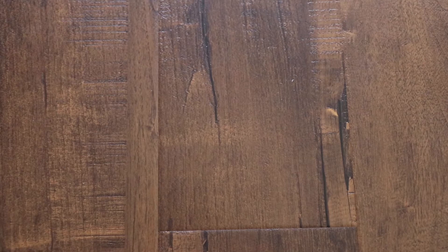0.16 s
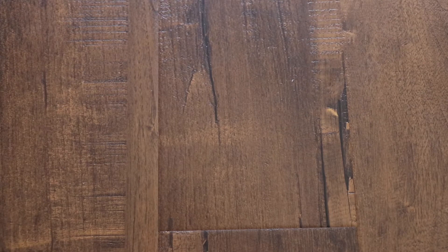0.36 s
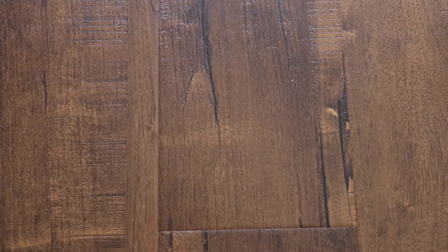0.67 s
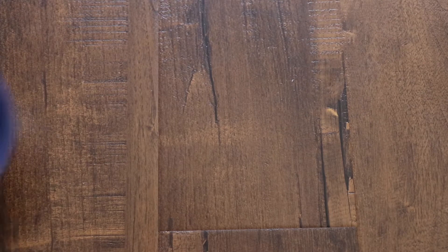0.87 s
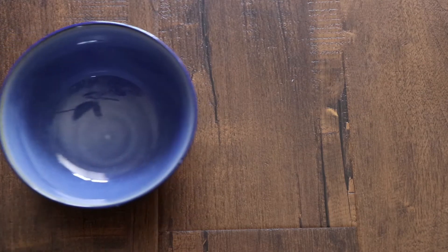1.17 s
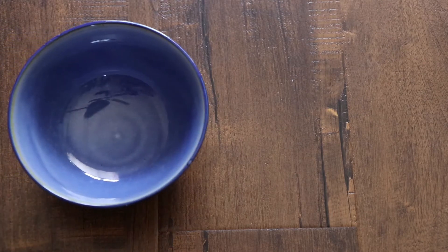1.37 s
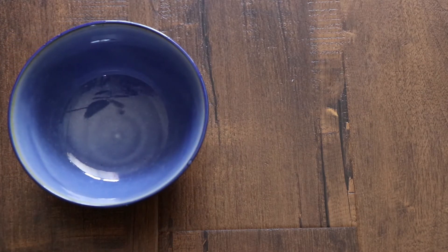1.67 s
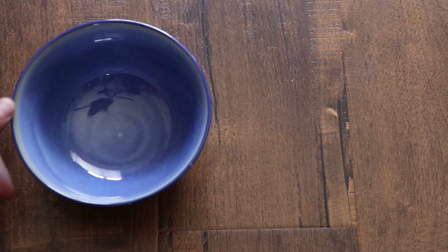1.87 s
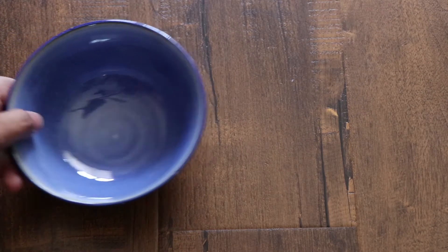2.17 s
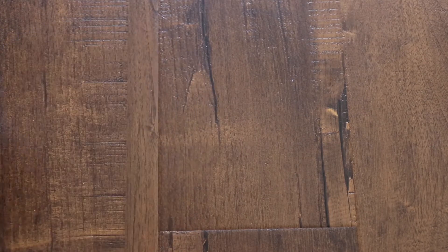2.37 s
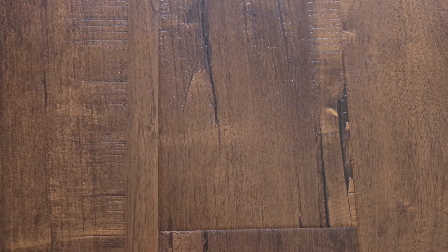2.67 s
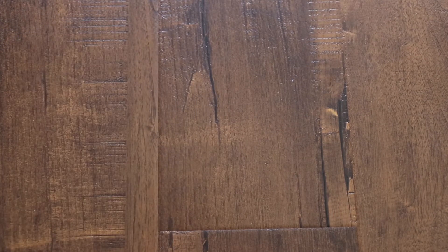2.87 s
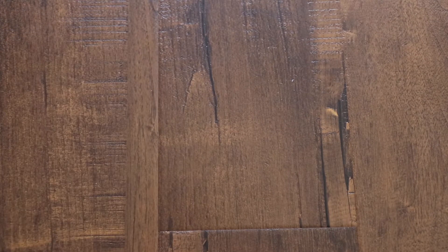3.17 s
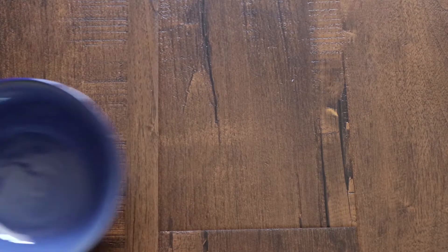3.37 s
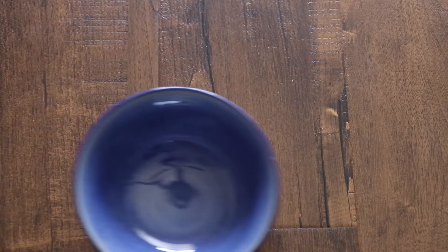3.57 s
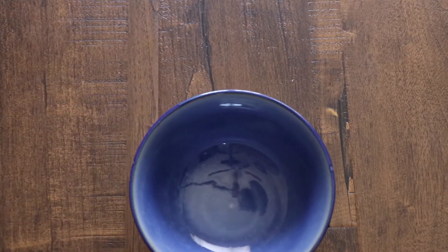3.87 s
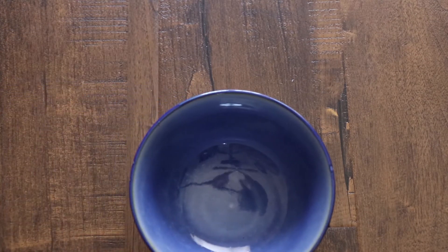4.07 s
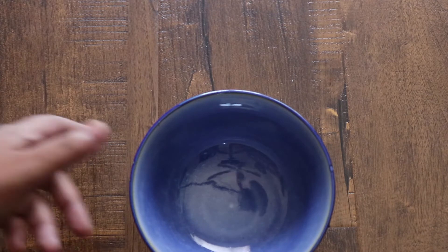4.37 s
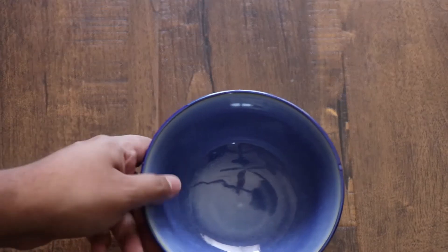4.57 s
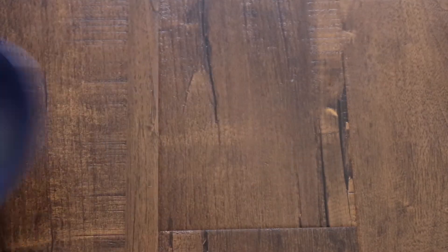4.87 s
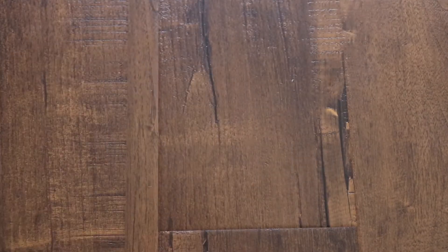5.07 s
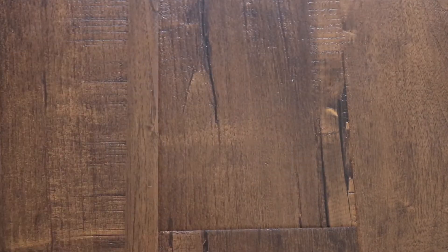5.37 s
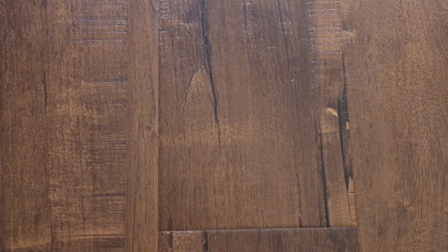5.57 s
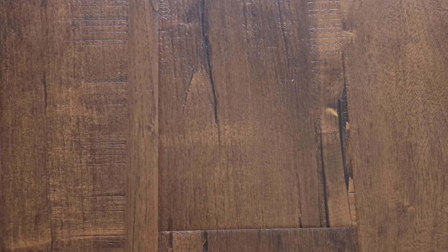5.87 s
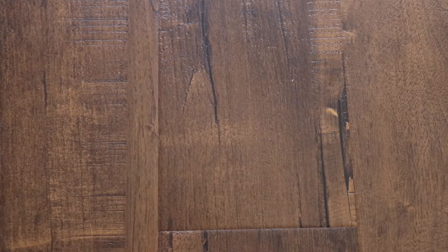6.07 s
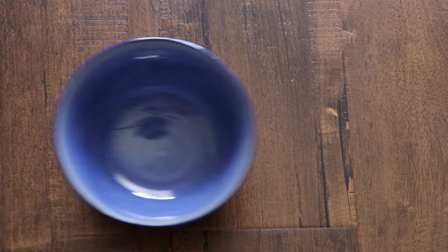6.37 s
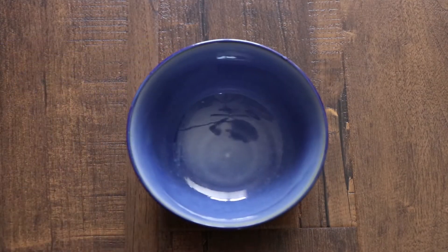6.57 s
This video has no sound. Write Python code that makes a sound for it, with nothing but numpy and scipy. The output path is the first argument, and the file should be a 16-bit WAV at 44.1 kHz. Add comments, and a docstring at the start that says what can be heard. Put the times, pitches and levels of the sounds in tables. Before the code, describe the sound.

Short hollow scrapes and knocks of a heavy ceramic bowl slid over a wooden tabletop, with pauses, faint cloth rustle, low room rumble and hiss.

```python
"""A quiet room rumbles and murmurs behind a steady hiss; then a ceramic bowl is set down with knocks.
It is pushed across a wooden table and lifted off again, several times, and a sleeve rustles.
Uneven impacts under the foot drive the resonances of the table, and grit those of the glazed wall.
A slow rim tone sings as pushes end; filtered noise makes the rub, cloth, room and hiss."""
import sys
import numpy as np
from scipy import signal
from scipy.fft import rfft, irfft, next_fast_len
from scipy.io import wavfile
from scipy.ndimage import uniform_filter1d, map_coordinates

SR = 44100
rng = np.random.default_rng(int(sys.argv[2]) if len(sys.argv) > 2 else 0)


def output_pcm(signal):
    """Save a mono or channel-first signal as 16-bit PCM at the path in sys.argv[1].

    Samples are clipped to [-1, 1] before scaling.
    """
    pcm = np.clip(np.atleast_2d(signal).T, -1, 1) * 32767
    wavfile.write(sys.argv[1], SR, np.round(pcm).astype(np.int16))


N = 295911  # length in samples

# Knocks of the foot on the table, as relative drive levels.
# Each row: time in seconds, boards in dB, then frame (thud) and snap (hardness) in dB re the boards.
KNOCK_BLOWS = [(0.452, -23.5, -41, -26), (0.462, -37.5, 3, -30), (0.478, -32, -1, -34),
               (0.683, -53.5, 14.5, -29), (0.741, -33, -30, -26), (0.767, -25, -35, -24),
               (0.916, -24, -11, -22), (0.952, -16, -19, -33), (0.963, -6, -24, -14),
               (1.002, -22, -22, -6.5), (1.128, -19.5, -8, -23), (2.186, -44.5, 10, -6.5),
               (2.234, -34, -21, -24), (3.15, -32.5, -17, -14), (3.317, -17, -23, -12.5),
               (3.356, -14, -36, -15), (3.37, -9, -32, -22), (3.387, -16, -3, -25), (3.399, -13, -24, -20),
               (3.445, -16, -23, -19), (3.518, -16.5, -14, -16), (3.716, -22, -15, -30),
               (3.774, -19, -31, -31), (3.816, -27, -15, -19.5), (4.566, -55, 11.5, -11.5),
               (4.587, -37.5, -11, -13), (4.645, -18.5, -13, -29), (4.678, -20.5, -17, -25),
               (4.691, -24, -20, -20), (5.465, -15, -30, -15.5), (5.485, -40, -9, -22),
               (5.505, -23, -22, -14.5), (5.546, -26, -26, -23), (5.704, -17.5, -39, -15.5),
               (5.724, -24.5, -11.5, -24), (5.948, -47, -9, -22), (5.968, -22, -8.5, -16.5),
               (6.075, -20.5, -31, -10.5), (6.18, -11, -31, -16), (6.187, -7.5, -25, -19),
               (6.203, -11.5, -33, -18), (6.229, -14.5, -17, -20), (6.386, -11.5, -15, -31),
               (6.396, -16, -18, -19), (6.441, -17, -17, -23), (6.603, -28.5, -5, -14),
               (6.624, -25.5, -6, -26)]
# Resonances of the wooden table: boards, strongest mode, lower modes of the frame, higher modes,
# and short modes at the top. Each row: centre in Hz, width in Hz, relative level in dB.
BOARD_MODES = [(390, 92, -7), (455.7, 31, -0.5), (527, 210, -5.5), (634, 55, -16.5)]
BELLY_MODE = [(503.1, 26, 8.5)]
FRAME_MODES = [(244, 38, -26), (307, 89, -1.5), (379.5, 100, 0)]
UPPER_MODES = [(715, 20.6, 19.5), (827, 32, 13.5), (905, 74, 5.5), (964, 92, -5), (1040, 100, 4),
               (1415, 110, -14.5)]
KNOT_MODES = [(1680, 200, -4), (1830, 130, 2.5), (2254, 1800, -3.5), (2430, 250, -8), (2896, 67, 3)]


def amp(db):
    """Level as the logarithm of amplitude: decibels to gain."""
    return 10 ** (np.asarray(db) / 20)


def unit(x):
    """Normalisation by mean power: x scaled to rms 1."""
    return x / np.sqrt(np.mean(x ** 2) + 1e-20)


def along(points, hz):
    """Logarithmic frequency scale: (Hz, value) points interpolated on it."""
    f, v = np.transpose(points)
    return np.interp(np.log(hz + 1), np.log(f + 1), v)


def gains(curves, level_db=lambda db: db):
    """Amplitude envelopes: dB curves become gains that add, each silent outside its own span."""
    t = np.arange(N) / SR
    total = np.zeros(N)
    for curve in curves:
        seconds, *columns = np.transpose(curve)
        # level_db turns the columns of a curve into one level
        level = np.interp(t, seconds, level_db(*columns), left=-200, right=-200)
        total += amp(level)
    return uniform_filter1d(total, size=60)


def swells(rows):
    """Rise and fall: each row becomes a curve of three points, quiet, peak, quiet."""
    swell_db = 30
    curves = []
    for peak, rise, fall, *db in rows:
        quiet = np.subtract(db, swell_db)
        curves.append([(peak - rise, *quiet), (peak, *db), (peak + fall, *quiet)])
    return curves


def wobble(rate):
    """Slow random modulation: a smooth curve through random knots, rate of them a second."""
    knots = rng.standard_normal(int(N * rate / SR) + 4)
    return map_coordinates(knots, [np.arange(N) * rate / SR])


def filtered(x, response):
    """Linear filtering: the spectrum of x times a complex response of frequency."""
    m = next_fast_len(N + 8192)
    hz = np.fft.rfftfreq(m, 1 / SR)
    return irfft(rfft(x, m) * response(hz), m)[:N]


def coloured(x, spectrum):
    """Spectral shaping: x given a spectrum of (Hz, dB per Hz), rms 1."""
    return unit(filtered(x, lambda hz: amp(along(spectrum, hz))))


def modes(table):
    """Modal superposition: causal response of resonances that all start in the same sense."""
    def response(f):
        return sum(amp(db) * 1j * f * width / (centre * centre - f * f + 1j * f * width)
                   for centre, width, db in table)
    return response


def rung(force, *tables):
    """Forced vibration: a force through resonances in series, scaled to turn unit noise into rms 1."""
    def response(f):
        return np.prod([modes(table)(f) for table in tables], axis=0)
    power = np.mean(abs(response(np.arange(1., SR / 2))) ** 2)
    return filtered(force, response) / np.sqrt(power)


def bumps(rate, spread_db, smooth):
    """Asperity contact: random impacts of uneven size over a share of smooth noise, rms 1."""
    hit, size, sign = rng.random((3, N))
    sizes = amp(-spread_db * np.log(size + 0.0022))  # exponential in dB
    impacts = (hit < rate / SR) * sizes * np.sign(sign - .5)
    smooth = np.clip(smooth, 0, 1)
    return np.sqrt(1 - smooth) * unit(impacts) + np.sqrt(smooth) * rng.standard_normal(N)


def room_tone():
    """Broadband background: distant rumble that swells, and a steadier murmur of air."""
    # Spectra of rumble and air. Each row: frequency in Hz, relative density in dB per Hz.
    rumble_spectrum = [(20, -35), (40, -34.5), (60, -7.5), (75, -10.5), (90, 2), (105, -3), (140, -8.5),
                       (190, -45), (310, -120)]
    air_spectrum = [(12, -57), (20, -17), (74, -12), (154, -6), (177, -10.5), (217, -4), (250, -9),
                    (345, -2.5), (414, -13), (596, -11), (823, -14), (1140, -16), (2500, -33.5),
                    (3250, -58), (5500, -120)]
    # Their levels before the wobble. Each row: time in seconds, level in dB.
    rumble_level = [(0.0, -77), (0.17, -70), (0.28, -79), (1.01, -69), (1.1, -80.5), (2.65, -83),
                    (3.23, -61.5), (3.34, -70), (3.44, -59.5), (3.53, -72.5), (4.75, -67.5), (5.53, -75),
                    (6.35, -71.5), (6.71, -80)]
    air_level = [(0.0, -67.5), (6.71, -63.5)]
    rumble_gain = gains([rumble_level]) * amp(.8 * wobble(2))
    rumble = rumble_gain * coloured(rng.standard_normal(N), rumble_spectrum)
    air_gain = gains([air_level]) * amp(0.37 * wobble(5.5))
    return rumble + air_gain * coloured(rng.standard_normal(N), air_spectrum)


def walls(x):
    """Reverberant decay: each frequency of the room's answer dies at its own speed."""
    # Decay of the room. Each row: frequency in Hz, time to fall by 60 dB in seconds.
    decay_times = [(200, 0.28), (1000, 0.24), (4000, 0.67), (12000, 0.052)]
    hz, t, z = signal.stft(rng.standard_normal(SR // 2), SR, nperseg=256)
    decay = amp(-60 * t / along(decay_times, hz)[:, None])
    tail = signal.istft(z * decay, SR, nperseg=256)[1]
    delayed = np.pad(x, (300, 0))  # samples before the answer
    return signal.fftconvolve(delayed, tail / np.linalg.norm(tail))[:N]


def sleeve():
    """Friction of cloth on cloth: dense soft grains of noise under slow swells."""
    # Rustles. Each row: peak time, rise and fall in seconds, level in dB before the wobble.
    rustles = [(1.546, 0.16, 0.38, -73), (1.76, 0.56, 1.4, -69), (2.382, 0.097, 0.14, -72),
               (4.2, .4, 0.45, -78.5), (4.4, 0.52, .3, -64.5), (4.842, 0.2, 0.21, -61.5),
               (5.006, .02, .08, -75), (5.356, 0.0087, 0.087, -67.5)]
    # Spectrum of the cloth. Each row: frequency in Hz, relative density in dB per Hz.
    cloth_spectrum = [(880, -12), (1500, -3.5), (2010, -5), (4730, -9), (5020, -9), (6800, -6.5),
                      (14900, -22.5), (15700, -21)]
    grains = bumps(rate=5000, spread_db=3.0, smooth=0.3)
    return gains(swells(rustles)) * amp(0.8 * wobble(24.67)) * coloured(grains, cloth_spectrum)


def rim():
    """Free decay of one mode: the rim sings on as a push ends and is stilled by a touch."""
    # Rings. Each row: start in seconds, nominal level in dB, time to fall by 60 dB in seconds,
    # time of the touch in seconds.
    rings = [(1.24, -51, .9, 1.51), (3.76, -54.5, 1.3, 4.57), (6.58, -50, 1.2, 6.8)]
    rim_hz = 883.4
    t = np.arange(N) / SR
    start, db, t60, still = np.transpose(rings)[:, :, None]
    since = np.clip(t - start, 0, None)
    decay = amp(db - 60 * since / t60)
    build = 1 - np.exp(-since / .03)
    damping = amp(-60 * np.clip(t - still, 0, None) / .05)  # 60 dB in 0.05 s
    level = (decay * build * damping).sum(axis=0)
    return level * amp(.7 * wobble(9)) * np.sin(2 * np.pi * rim_hz * t)


def blows(column, offset_db):
    """Impulsive excitation: one impulse a knock, at the boards' level plus a column (0: none)."""
    rows = np.array(KNOCK_BLOWS)
    db = rows[:, 1] + (rows[:, column] if column else 0) + offset_db
    at = np.round(rows[:, 0] * SR).astype(int)
    return -np.bincount(at, amp(db), N)


def ticks():
    """Transmitted impact: what the knocks pass on to the wall, in either sense."""
    return blows(column=3, offset_db=-11) * np.sign(rng.standard_normal(N))


def glaze(strength):
    """Selective resonance: each wall mode meets its own grit, through a band the thick foot passes."""
    # Modes of the bowl wall. Each row: centre in Hz, width in Hz, relative level in dB.
    wall_modes = [(7762, 32, 0), (9497, 36, 0), (11270, 45, -19), (11350, 45, -19), (12530, 36, -14),
                  (13310, 50, -16), (13740, 50, -16), (15600, 38, -16)]
    out = np.zeros(N)
    for hz, width, db in wall_modes:
        grit = strength * amp(2.2 * wobble(15)) * bumps(rate=1200, spread_db=1.5, smooth=0.11)
        out += amp(db - 4.5) * rung(grit + ticks(), [(hz, width, 0)], [(hz, 12 * width, 0)])
    return out


def knocks():
    """Impact excitation: a short push into the table modes, and a snap with splinters into the top ones."""
    t = np.arange(SR // 20) / SR
    boards = rung(blows(column=0, offset_db=21), BOARD_MODES + BELLY_MODE, [(519, 660, 0)])
    frame = rung(blows(column=2, offset_db=25), FRAME_MODES)
    upper = rung(blows(column=3, offset_db=27.5), UPPER_MODES, [(895, 3300, 0)])
    push = np.exp(-((t[:60] - 7e-4) / 0.00022) ** 2) / 20  # contact lasts about half a millisecond
    body = np.convolve(boards + frame + upper, push)[:N]
    splinter_decay = amp(-60 * t / 0.062)  # 60 dB in 0.062 s, cut off at 0.05 s
    splinter_level = np.convolve(blows(column=3, offset_db=-10.0), splinter_decay)[:N]
    splinters = splinter_level * rng.standard_normal(N)
    snap = splinters + blows(column=3, offset_db=9)
    return body + rung(snap, KNOT_MODES, [(2180, 1300, 0)], [(2180, 1300, 0)])


def contact(depth, hop):
    """Intermittent contact: the foot hops clear around each knock, for about hop s, so rubbing thins."""
    seconds = np.array(KNOCK_BLOWS)[:, 0] + 0.0028
    at = np.bincount(np.round(seconds * SR).astype(int), minlength=N)
    lift = np.exp(-(np.arange(-SR // 20, SR // 20 + 1) / SR / hop) ** 2)
    lifted = np.clip(signal.fftconvolve(at, lift, "same"), 0, 1)
    return 1 - np.clip(depth, 0, 1) * lifted


def follows(layer):
    """Friction power laws: the gain of one layer follows the weight, speed and rasp of the push."""
    # Long pushes, one curve each. Each row: time in seconds, weight, speed and rasp as control
    # levels in dB (these three lead the boards, the glaze and the scrape).
    pushes = [
        [(0.7, -58.5, -75, -72), (0.8, -30, -56.5, -52), (0.91, -31.5, -49, -43.5), (0.952, -24.5, -53.5, -45),
         (0.964, -25, -46.5, -34.5), (0.978, -21, -44, -45), (1.004, -31, -41, -44), (1.016, -26.5, -60, -42),
         (1.046, -26.5, -44, -43.5), (1.088, -35, -53, -47.5), (1.122, -28.5, -50.5, -48),
         (1.28, -43, -61, -56), (1.42, -88, -86.5, -74)],
        [(2.95, -80, -95, -81), (3.086, -51.5, -70, -63), (3.114, -47.5, -62, -52.5), (3.216, -30, -56.5, -38),
         (3.336, -33.5, -41.5, -37), (3.358, -31, -43, -35.5), (3.372, -23, -47, -36), (3.43, -25, -49, -40.5),
         (3.732, -30, -50, -47), (3.752, -32, -60, -54.5), (3.79, -30, -49.5, -57), (3.932, -86, -89.5, -67),
         (3.95, -63, -88, -79)],
        [(5.945, -56, -80, -84), (5.969, -33, -81, -44), (6.001, -36.5, -72, -53.5), (6.069, -28, -54.5, -37),
         (6.159, -30, -40, -39.5), (6.189, -18.5, -48.5, -37), (6.251, -25.5, -47, -39.5),
         (6.357, -26, -46, -42.5), (6.377, -28, -43, -38.5), (6.387, -21, -50, -44), (6.471, -30.5, -42.5, -46),
         (6.645, -41.5, -61.5, -58.5), (6.71, -83, -87, -76)],
    ]
    # Short scuffs as the bowl settles or is picked up. Each row: peak time, rise and fall
    # in seconds, weight, speed and rasp in dB.
    scuffs = [(0.456, .003, 0.15, -34, -75, -63), (1.96, .06, 0.19, -55, -64.5, -61.5),
              (2.19, .004, 0.022, -41, -69, -57), (2.234, 0.033, 0.059, -51, -69, -67.5),
              (4.57, 0.0038, .1, -55, -70, -70), (4.64, 0.093, 0.058, -35, -56, -52.5),
              (4.682, 0.053, 0.097, -41, -62.5, -53.5), (5.468, 0.0058, 0.23, -33, -80, -45),
              (5.62, 0.28, 0.17, -59.5, -69, -53.5), (5.707, 0.0033, .22, -33, -75, -49)]
    # Usual weight, speed and rasp of a push, in dB.
    usual_db = (-28, -48, -43)
    # Law of each layer: nominal level in dB at the usual values, then dB per dB of weight, speed, rasp.
    laws = {"belly": (-33, 1.28, 0.1, 0.15), "boards": (-30.5, 0.7, -0.06, 0.2),
            "frame": (-35.5, 0.26, 0.32, .1), "upper": (-32.5, .5, 0.35, 0.3),
            "scrape": (-43, -0.01, 0.13, 1.17), "glaze": (-46.5, 0.02, 1.06, 0.06),
            "hiss": (-55.5, -0.17, 0.26, 0.93)}
    db, *slopes = laws[layer]

    def law(*controls):
        return db + sum(slope * (control - usual)
                        for slope, control, usual in zip(slopes, controls, usual_db))
    return gains(pushes + swells(scuffs), law)


def slide():
    """Roughness excitation: the foot chatters over the grain; bumps shake the boards, grit the glaze."""
    # Spectra of the rub and of the foot's fine hiss. Each row: frequency in Hz, relative dB per Hz.
    rub_spectrum = [(800, -27), (1300, -8), (2000, 0), (3100, -4), (3500, -10), (4200, -19), (6000, -47),
                    (16000, -71)]
    grit_spectrum = [(2500, -21), (3800, -4.5), (5600, -6.5), (7000, -9.5), (8600, -9.5), (10500, -17.5),
                     (13000, -20), (14800, -25), (15900, -26.5)]
    chatter = amp(1.16 * wobble(45)) * contact(depth=0.37, hop=0.0082)
    coarse = chatter * bumps(rate=1500, spread_db=2.5, smooth=0.34)
    # the belly is excited more at some places than at others
    belly_force = follows("belly") * amp(1.55 * wobble(11)) * coarse
    belly = rung(belly_force, BELLY_MODE, [(504, 630, 0)])
    boards = rung(follows("boards") * coarse, BOARD_MODES, [(473.0, 345, 0)])
    frame = rung(follows("frame") * coarse, FRAME_MODES, [(330, 274, 0)])
    upper = rung(follows("upper") * coarse, UPPER_MODES, [(903, 183, 0)])
    scrape = follows("scrape")
    rasp = amp(-9.0) * rung(scrape * coarse, KNOT_MODES, [(2250, 2500, 0)], [(2250, 2500, 0)])
    rub_noise = coloured(bumps(rate=3700, spread_db=2.5, smooth=0.72), rub_spectrum)
    rub = amp(-2.5) * scrape * chatter * rub_noise
    fine = follows("glaze") * amp(1.6 * wobble(30))
    hiss_noise = coloured(bumps(rate=4900, spread_db=3.0, smooth=0.36), grit_spectrum)
    hiss = follows("hiss") * amp(1.5 * wobble(60)) * hiss_noise
    return boards + belly + frame + upper + rasp + rub + glaze(fine) + hiss


def radiated(x, corner_hz):
    """Radiation efficiency: the table moves little air below its size, a steep causal high-pass."""
    return filtered(x, lambda f: (1j * f / (corner_hz + 1j * f)) ** 3)


def scene():
    """Superposition of sources: bowl and table with their reverberation, sleeve and room."""
    # The bowl and its reverberation stop dead between these two times, in seconds.
    stop = (5.79, 5.93)
    bowl = radiated(slide() + knocks(), corner_hz=169) + rim()
    t = np.arange(N) / SR
    sounding = (t < stop[0]) | (t > stop[1])
    heard = uniform_filter1d(1. * sounding, size=150)
    bowl_in_room = heard * (bowl + amp(-12) * walls(bowl))
    return (bowl_in_room + sleeve() + room_tone())[None]


def record(dry):
    """Self-noise and bandwidth: microphone hiss is added, then all above the band limit is removed."""
    # Spectrum of the microphone noise. Each row: frequency in Hz, relative density in dB per Hz.
    noise_spectrum = [(880, -19.5), (1500, 0), (1700, -2), (2160, -4.5), (2310, -4.5), (3660, -6.5),
                      (15700, -11.5)]
    hiss_db, top_hz = -74.5, 15820
    hiss = amp(hiss_db) * coloured(rng.standard_normal(N), noise_spectrum)
    return filtered(dry[0] + hiss, lambda hz: hz < top_hz)[None]


dry = scene()
out = record(dry)
output_pcm(out)
```